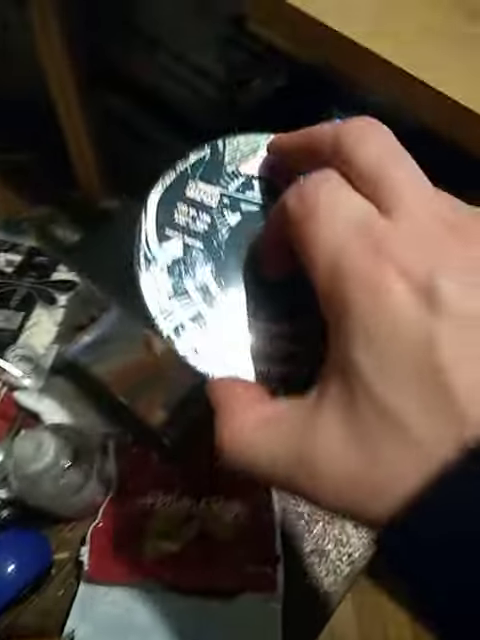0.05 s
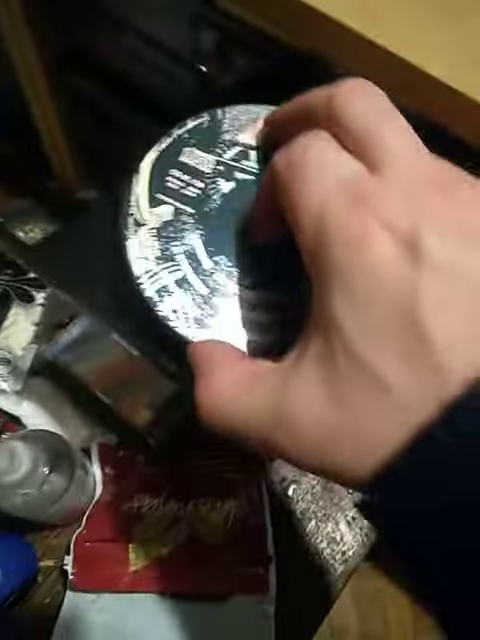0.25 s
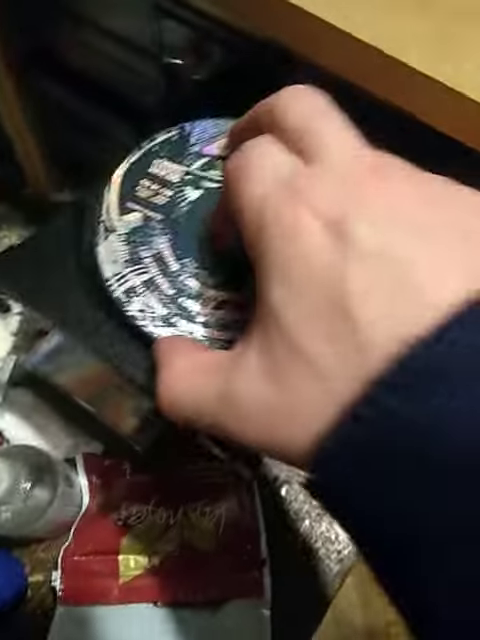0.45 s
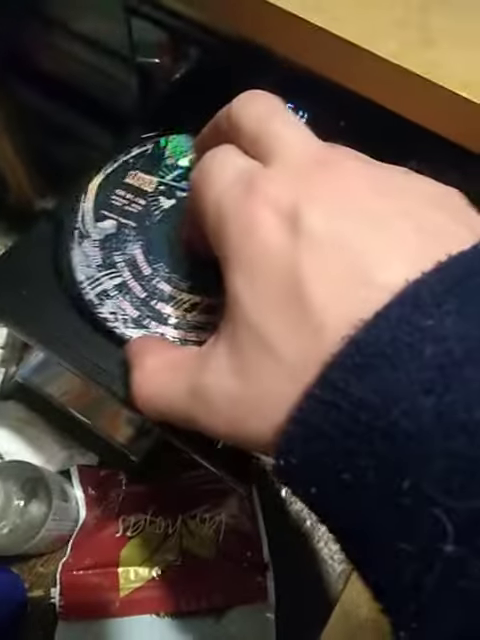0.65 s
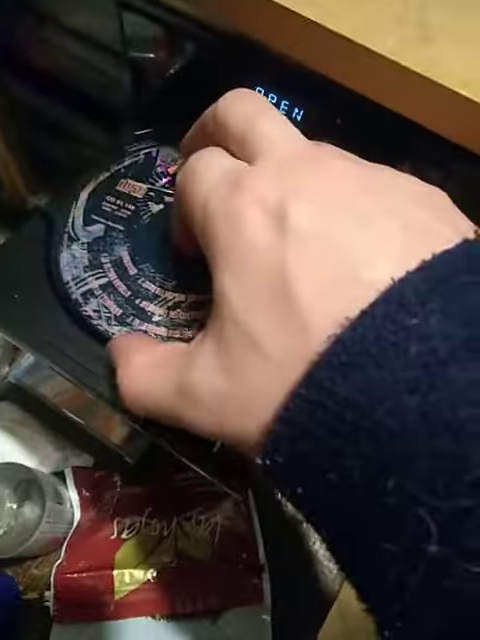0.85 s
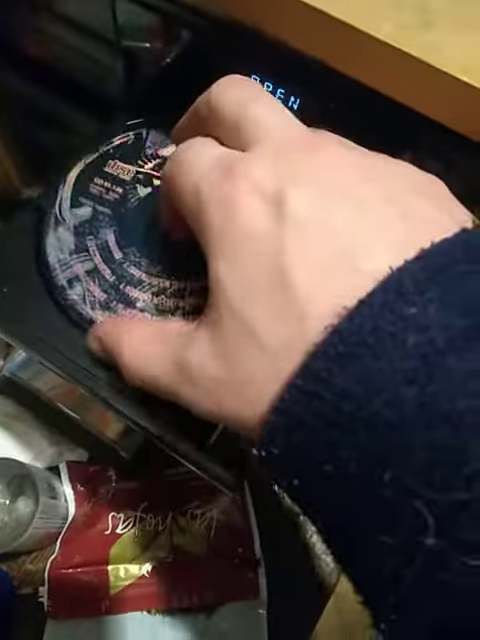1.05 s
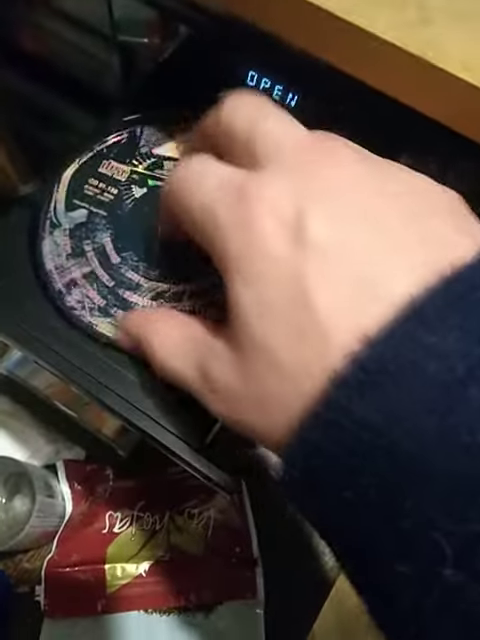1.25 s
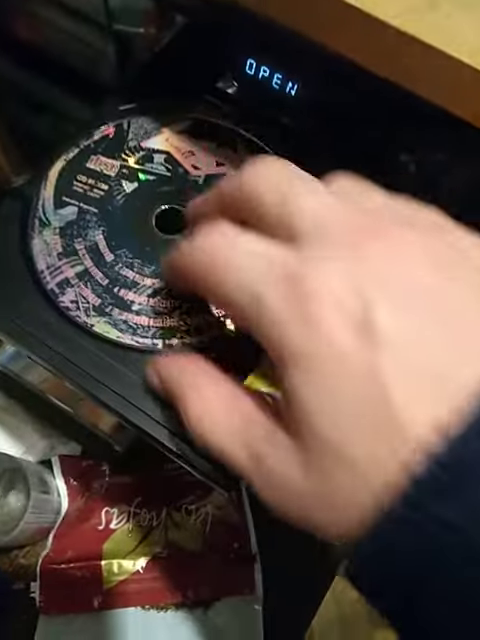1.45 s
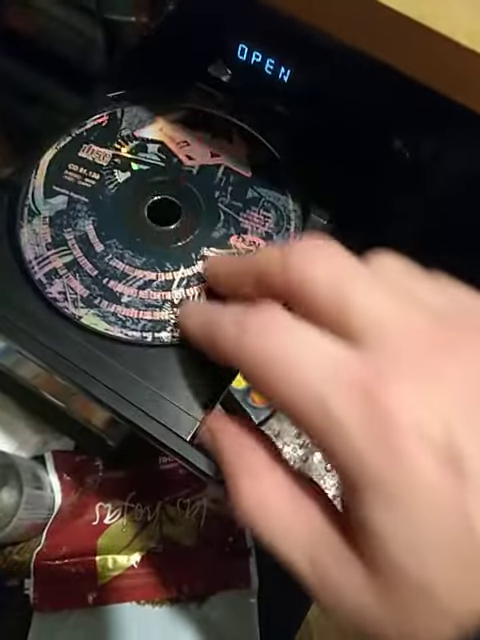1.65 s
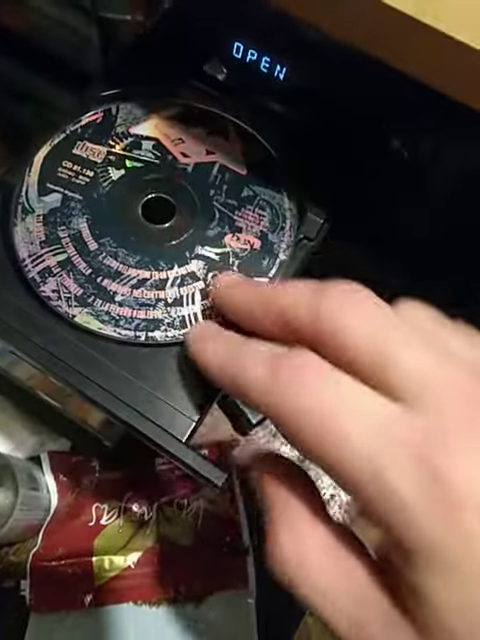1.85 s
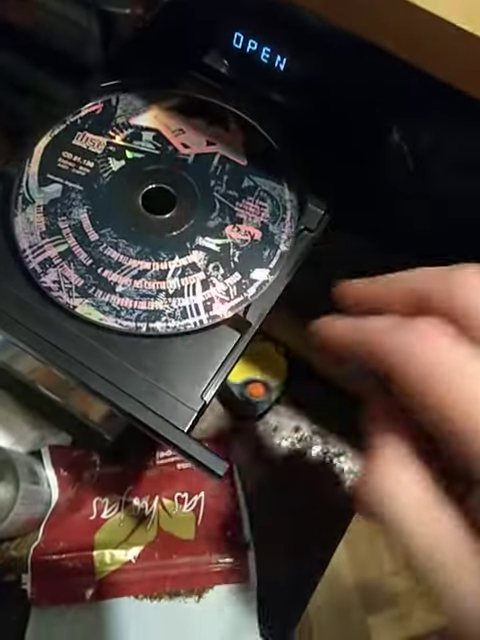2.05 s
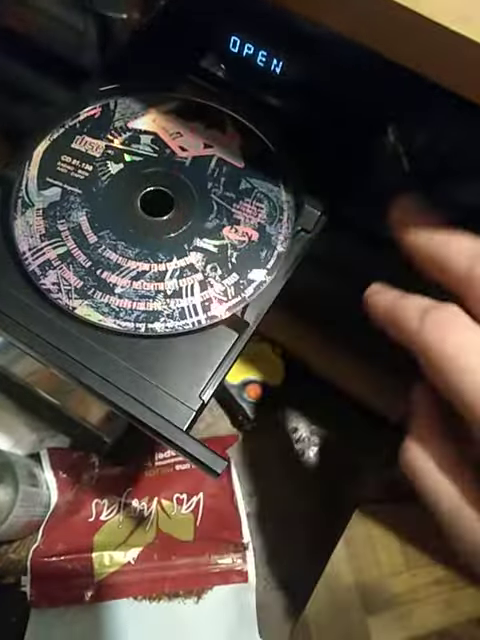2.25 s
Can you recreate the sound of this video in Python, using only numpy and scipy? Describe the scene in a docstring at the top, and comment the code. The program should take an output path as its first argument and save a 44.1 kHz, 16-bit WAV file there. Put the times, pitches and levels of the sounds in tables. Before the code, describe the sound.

Close phone pickup in a quiet indoor room with low lumpy rumble and soft hiss. Just after one second a disc snaps into a hollow plastic tray, followed by tiny ticks and a faint finger scuff. After a near-silent pause, latches knock, a small geared motor whirrs for about a second and a half, and the mechanism clunks to a stop.

```python
"""A quiet room: low lumpy rumble and flickering hiss, then a faint squeak. A hand sets a disc in a
plastic tray with a clack and a finger scuffs it; later latches knock, a small geared motor whirrs and
the mechanism clunks to a stop. Blows are contact rattles through ringing modes, gears and room are
shaped noise, the motor is a set of shaft orders. A phone hears it: each channel subtracts a delayed
copy of the other microphone to widen the picture."""
import sys
import numpy as np
from scipy import signal
from scipy.fft import rfft, irfft
from scipy.io import wavfile
from scipy.ndimage import uniform_filter1d

SR = 44100
rng = np.random.default_rng(int(sys.argv[2]) if len(sys.argv) > 2 else 0)


def gain_from_db(level_db):
    """Convert decibel levels to linear amplitude factors (20 dB per decade)."""
    decades = np.asarray(level_db, float) / 20
    return 10 ** decades


def master(y):
    """Save y as 16-bit WAV."""
    cut = np.clip(np.atleast_2d(y).T, -1, 1)
    pcm = np.round(cut * 32767)  # scale
    wavfile.write(sys.argv[1], SR, pcm.astype(np.int16))


N = 246078


def evened(x):
    """Scale to rms 1."""
    return x / np.sqrt(np.mean(x ** 2) + 1e-20)


def read(points, hz):
    """Interpolate a table over log frequency."""
    f, value = np.transpose(points)
    return np.interp(np.log(hz + 1), np.log(f + 1), value)


def curves(rows, t):
    """Interpolate each column of a table over time."""
    s, *columns = np.transpose(rows)
    return [np.interp(t, s, c) for c in columns]


def switched(t, on_s, off_s, fade_s):
    """Gate with linear fades inside its ends."""
    return np.clip(np.minimum(t - on_s, off_s - t) / fade_s, 0, 1)


def slow(samples):
    """Random wander of rms 1, from white noise averaged twice over this many samples."""
    once = uniform_filter1d(rng.standard_normal(N), int(samples))
    return evened(uniform_filter1d(once, int(samples)))


def noise(spectrum, likeness, patchy_db):
    """Two-microphone noise of rms 1: given spectrum, correlation and drifting time-frequency patches."""
    a, b, c, d, patches = rng.standard_normal((N // 128 + 5, 257, 5)).T
    patches = uniform_filter1d(patches, 6, 0)
    patches = evened(uniform_filter1d(patches, 12, 1))
    first = a + 1j * b
    second = likeness * first + np.sqrt(1 - likeness ** 2) * (c + 1j * d)
    z = np.array([first, second]) * gain_from_db(patchy_db * patches)
    white = signal.istft(z, nperseg=512, noverlap=384)[1][:, :N]
    gain = gain_from_db(read(spectrum, np.fft.rfftfreq(N, 1 / SR)))
    return evened(irfft(rfft(white) * gain, N))


def resonate(x, hz, width_hz):
    """A resonance applied twice, so that its skirts fall steeply."""
    r = np.exp(-np.pi * width_hz / SR)
    pole = [1, -r * np.exp(2j * np.pi * hz / SR)]
    return signal.lfilter([1], np.convolve(pole, pole), x).real


def causal(db):
    """Minimum-phase impulse response with this gain on the rfft bins."""
    log = np.log(gain_from_db(np.concatenate([db, db[-2:0:-1]])))
    return np.fft.ifft(np.exp(signal.hilbert(log).conj())).real[:len(db) // 2]


# low rumble: t/s, level/dB
ROOM_LEVEL = [(0, -63.5), (.95, -61), (1.2, -55), (1.7, -59.5), (2.3, -57), (3.07, -61.5), (3.6, -59)]
# low rumble of room and tray: f/Hz, density/dB per Hz
RUMBLE_SPECTRUM = [(30, -24), (70, -10.5), (110, -9), (163, 1), (200, -8.5), (250, -1.5), (310, -3.5),
                   (360, -48), (600, -51.5)]
# hiss of the phone: f/Hz, density/dB per Hz
HISS_SPECTRUM = [(40, 8.5), (350, -9.5), (500, -9.5), (1000, -14), (2000, -18.5), (4000, -22),
                 (8000, -29.5), (15000, -40)]
HISS_DB = -62  # before flicker


def room(t):
    """Low rumble in lumps, stronger at the left port, plus nearly uncorrelated, flickering hiss."""
    rumble_db, = curves(ROOM_LEVEL, t)
    lumps = slow(370)
    port_gain = gain_from_db(np.array([[1.5], [-1.5]]))
    rumble = gain_from_db(rumble_db + 4.47 * lumps) * noise(RUMBLE_SPECTRUM, 0.35, 0.85) * port_gain
    flicker_db = 0.4 * lumps + 1.6 * slow(400) + 0.9 * slow(4000)
    return rumble + gain_from_db(HISS_DB + flicker_db) * noise(HISS_SPECTRUM, 0.012, 1.0)


# squeaks: t/s, half length/s, f/Hz, level/dB, octave re fundamental/dB
SQUEAK_EVENTS = [(0.989, 0.014, 878, -56.5, -2.5), (2.985, .04, 1390, -67, -6)]


def squeak(t):
    """Faint tones with octaves, roughened by pitch wander; left microphone only."""
    wander = 1 + 0.021 * slow(130)
    out = np.zeros((2, N))
    for s, half_s, hz, db, octave_db in SQUEAK_EVENTS:
        turns = np.cumsum(hz * wander) / SR
        tone = np.cos(2 * np.pi * turns) + gain_from_db(octave_db) * np.cos(2 * np.pi * 2 * turns)
        out[0] += gain_from_db(db) * np.exp(-((t - s) / half_s) ** 2) * tone
    return out


# contact noise: f/Hz, density/dB per Hz
CRACK_SPECTRUM = [(60, -21), (200, -3.5), (500, -1), (1000, 4.5), (2000, -5), (3500, -5.5), (6000, -13.5),
                  (8000, -25), (11000, -35.5), (15000, -38.5)]
HARDEST_S, HARDEST_DB = 0.002, 16  # hardest contact: after first touch, above the others
RING_CAP_S = 0.1  # longest modal t60


def blow(modes, muffle_db, level_db, tilt_db, t60, body_db, ring_db):
    """A short rattle of contacts, heard directly and through the modes of the struck part."""
    t, hz = np.arange(8192) / SR, np.fft.rfftfreq(4096, 1 / SR)
    common, *own = rng.standard_normal((3, len(t)))
    rattle = (common + 1.5 * np.array(own)) * (1 - np.exp(-t / 0.00077)) * gain_from_db(-60 * t / t60)
    rattle[:, round(HARDEST_S * SR)] += gain_from_db(HARDEST_DB)
    rings = sum(gain_from_db(db - 60 * t / min(ring_s, RING_CAP_S)) * np.sin(2 * np.pi * f * t)
                for f, db, ring_s in modes)
    crack = causal(read(CRACK_SPECTRUM, hz))
    voice = gain_from_db(ring_db) * rings / np.linalg.norm(rings)
    voice[:len(crack)] += crack / np.linalg.norm(crack)
    tilt = tilt_db * np.log2((hz + 100) / 1500)
    body = body_db / (1 + (hz / 600) ** 4)
    muffle = muffle_db / (1 + (5600 / (hz + 1)) ** 8)
    coloured = signal.fftconvolve(voice, causal(tilt + body + muffle))
    sound = signal.fftconvolve(rattle, coloured[None], axes=1)[:, :len(t)]
    return gain_from_db(level_db) * sound / np.sqrt((sound[:, :400] ** 2).mean())  # rms of the first 9 ms


RATTLE_LOSS = 0.21  # dB of rattle t60 lost per dB of ringing


def struck(modes, rows, rattle_s):
    """Sum of blows on one part; blows that ring more rattle shorter."""
    out = np.zeros((2, N + 8192))
    for s, level_db, tilt_db, body_db, ring_db in rows:
        muffle_db = -12 * (s > SHAFT_SPEED[0][0])  # later blows fall deep inside the case, which dulls them
        t60 = rattle_s * gain_from_db(-RATTLE_LOSS * ring_db)
        sound = blow(modes, muffle_db, level_db, tilt_db, t60, body_db, ring_db)
        out[:, round(s * SR):][:, :8192] += sound
    return out


# tray modes: f/Hz, level/dB, t60/s
TRAY_MODES = [(328, -6, 0.1), (523, -5, 0.08), (650, -10, .03), (820, -4, 0.045), (1030, 0, 0.05),
              (1090, -4, 0.04), (1310, -8, .025), (1830, -8, 0.017), (3461, -7, 0.03), (5927, -14, .03)]
# disc on tray: t/s, rms of first 9 ms/dB, tilt/dB per octave, low body/dB, ringing re contact noise/dB
DISC_HITS = [(1.167, -53, -3.5, -6, -1), (1.183, -36.5, 0.5, -3, 22), (1.188, -25.5, 4, 8, 3.5),
             (1.194, -32.5, 1.5, 7.5, 10), (1.206, -32, -2, 16.5, -17), (1.294, -49.5, 1.5, 4, -11),
             (1.366, -47, 2, 3, -13), (1.806, -58, 0.5, -16, 1), (1.817, -50.5, -1.5, -7, -8),
             (1.852, -62.5, -2, -9, -12)]


def disc():
    """The disc clacks into the plastic tray and excites its modes."""
    return struck(TRAY_MODES, DISC_HITS, rattle_s=0.078)  # t60 at 0 dB ringing


# wall echoes: f/Hz, t60/s
WALL_DECAY = [(300, 0.37), (2000, 0.17), (8000, 0.23)]


def walls(strikes):
    """Add sparse random-sign echoes, decaying at a frequency-dependent rate."""
    taps = np.zeros((2, SR))
    at = np.arange(300, SR - 20, 20) + rng.integers(0, 20, (2, (SR - 301) // 20))
    np.put_along_axis(taps, at, rng.choice([-1., 1.], at.shape), 1)
    hz, t, z = signal.stft(taps, SR, nperseg=256)
    decay = gain_from_db(-60 * t / read(WALL_DECAY, hz)[:, None])
    tail = signal.istft(z * decay, SR, nperseg=256)[1]
    wet = signal.fftconvolve(strikes, tail / np.linalg.norm(tail[0]), axes=1)
    return strikes[:, :N] + gain_from_db(-8.5) * wet[:, :N]


# finger on tray: f/Hz, density/dB per Hz
SCUFF_SPECTRUM = [(400, -20), (1000, -1), (3600, -10), (8000, -29)]
SCUFF_S, SCUFF_HALF_S, SCUFF_DB = 1.805, 0.042, -60.5


def scuff(t):
    """A finger brushes the tray: a soft swell of friction noise."""
    swell = np.exp(-((t - SCUFF_S) / SCUFF_HALF_S) ** 2)
    return gain_from_db(SCUFF_DB + 1.9 * slow(200)) * swell * noise(SCUFF_SPECTRUM, 0.4, 5.7)


# chassis modes: f/Hz, level/dB, t60/s
CHASSIS_MODES = [(365, -2.5, 0.1), (611, -5.5, 0.21), (880, -4.5, 0.036), (1080, -0.5, 0.02),
                 (1288, -1, 0.038), (1402, 7, 0.042), (1860, 9, 0.0075), (3510, -1.5, 0.046)]
# latches: t/s, rms of first 9 ms/dB, tilt/dB per octave, low body/dB, ringing re contact noise/dB
LATCH_HITS = [(3.713, -37.5, 0.3, -43, -6.5), (3.757, -33, 0.7, -1, 0), (3.786, -40.5, 7, -6, -2),
              (3.801, -34.5, -1, 5.5, -21), (3.857, -38.5, 0, 0.5, -4), (3.866, -39, 1, -7, 4.5),
              (3.883, -27, -5, -17.5, 4), (3.902, -37.5, -1.5, 1, 2.5), (4.589, -38, -2, -27.5, 16),
              (5.156, -33, 2, -13, 2), (5.165, -38, 0, 3, 7), (5.199, -42.5, -0.5, 6, -5),
              (5.222, -29.5, 3.5, 26.5, 13), (5.229, -33, -2.5, 14, 7), (5.292, -41, 0.5, 17, -1),
              (5.326, -41.5, 3.5, -2, 13), (5.351, -37, 3.7, 10, -1), (5.395, -42, -3.5, -1, 4)]


def latches():
    """Latches and the stopping mechanism knock on the chassis and excite its modes."""
    return struck(CHASSIS_MODES, LATCH_HITS, rattle_s=0.056)  # t60 at 0 dB ringing


# gear mesh noise: t/s, level/dB
MESH_LEVEL = [(3.72, -86), (3.85, -52), (3.891, -42.5), (4.551, -43.5), (4.6, -47), (4.96, -42.5),
              (5.13, -44.5), (5.3, -40), (5.41, -44), (5.45, -52), (5.519, -78.5)]
# free running mesh: f/Hz, density/dB per Hz
RUNNING_SPECTRUM = [(350, -2), (420, -24.5), (550, -13), (700, -3), (820, -3), (1200, 1), (1500, 3),
                    (1900, -4), (2400, -6.5), (3000, -12), (3700, -2.5), (4600, -5), (5200, -19.5),
                    (5900, -37), (6500, -23.5), (12000, -87.5)]
# strained mesh: f/Hz, density/dB per Hz
STRAINING_SPECTRUM = [(60, 5.5), (150, -4.5), (350, 10), (600, 3), (1000, 0), (1500, -13.5), (2400, -15),
                      (3300, -1.5), (4600, -14), (5900, -29), (8000, -62), (12000, -82)]
# case resonances rung by the gears: f/Hz, width of one pass/Hz, level/dB
CASE_MODES = [(864, 69, -3), (1033, 18, -6.5), (1373, 34, 1), (1450, 36, -1.5), (3700, 180, -13.5),
              (5300, 30, -20.5), (5870, 40, -32), (6370, 40, -31)]
TRAY_DB, TRAY_ENDS_DB = -46, -12  # sliding tray rumble; change at start and stop
TRAY_RISE_S, TRAY_FALL_S = 0.14, 0.061
STRAIN_FROM_S, STRAIN_RISE_S, STRAIN_SHARE = 5.15, 0.055, 0.73  # as the mechanism locks
SQUEAL_FROM_S, SQUEAL_TOP_S, SQUEAL_END_S, SQUEAL_DB = 4.86, 5.15, 5.19, -49  # rough whistle
BUZZ = 0.18  # depth of the once-a-turn pulse


def gears(t):
    """Teeth rub and chatter unevenly and ring the case; under strain the sound drops lower."""
    mesh_db, = curves(MESH_LEVEL, t)
    on_s, off_s = MESH_LEVEL[0][0], MESH_LEVEL[-1][0]
    rub = noise([(20, 0.0091), (20000, 0.0068)], 0.4, 3.2) * gain_from_db(1.5 * slow(150))  # nearly white
    case = evened(sum(gain_from_db(db) * evened(resonate(rub, hz, width_hz)) for hz, width_hz, db in CASE_MODES))
    turns = np.cumsum(curves(SHAFT_SPEED, t)[0]) / SR
    buzz = 1 + BUZZ * np.cos(2 * np.pi * turns)
    running = buzz * noise(RUNNING_SPECTRUM, 0.022, 1.9) + gain_from_db(-5.5) * case
    chatter_db = 5.0 + 2.7 * np.tanh(slow(78))
    straining = gain_from_db(chatter_db) * noise(STRAINING_SPECTRUM, 0.11, 0.4)
    strain = STRAIN_SHARE * np.clip((t - STRAIN_FROM_S) / STRAIN_RISE_S, 0, 1)
    mesh = np.sqrt(1 - strain) * running + np.sqrt(strain) * straining

    sliding = np.clip(np.minimum((t - on_s) / TRAY_RISE_S, (off_s - t) / TRAY_FALL_S), 0, 1)
    tray_db = TRAY_DB + TRAY_ENDS_DB * (1 - sliding)
    tray = gain_from_db(tray_db + 1.2 * slow(260)) * noise(RUMBLE_SPECTRUM, 0.21, 1.0)

    swell = np.interp(t, (SQUEAL_FROM_S, SQUEAL_TOP_S, SQUEAL_END_S), (0, 1, 0))
    squeal = gain_from_db(SQUEAL_DB) * swell * evened(resonate(rub, hz=3427, width_hz=130))
    total = gain_from_db(mesh_db + 1.8 * slow(330)) * mesh + tray + squeal
    return total * switched(t, on_s, off_s, 0.0058)


# shaft speed, sagging under load in mid travel: t/s, f/Hz
SHAFT_SPEED = [(3.922, 280.7), (3.998, 288.2), (4.25, 289.3), (4.449, 289.5), (4.54, 277), (4.88, 273),
               (4.979, 287.8), (5.081, 293), (5.22, 290)]
# shaft orders, one per mount row: multiple of shaft speed
SHAFT_ORDERS = (2, 3, 4, 6, 12, 5)
# motor mount: resonance f/Hz, width/Hz, tone peak level/dB, phase gap between microphones/rad, waver/dB
MOUNT_MODES = [(536, 37, -51.5, 0.87, 3.7), (868, 15, -42.5, 1.24, 1.2), (1095, 67, -58.5, 1.4, 3.7),
               (1674, 80, -55, 1.9, 2.1), (3551, 58, -56, 1.25, 7.3), (1413, 59, -41.5, 1.03, 3.4)]
LOADED_FROM_S, LOADED_TO_S = 4.24, 4.97  # second order sounds while the tray loads the shaft
DAMPED_FROM_S, DAMPING_DB_PER_S = 5.0, -110  # fifth order dies as the tray seats


def motor(t):
    """Shaft orders as wavering tones, loudest near mount resonances, each with its own phase gap."""
    hz, = curves(SHAFT_SPEED, t)
    turns = np.cumsum(hz * (1 + 0.0025 * slow(447))) / SR
    # a gear wheel runs out of round
    throb = 1 + 0.41 * np.cos(2 * np.pi * turns / 5.2 + 1.15 * slow(1500))
    out = np.zeros((2, N))
    for order, (mount_hz, width_hz, db, gap_rad, waver_db) in zip(SHAFT_ORDERS, MOUNT_MODES):
        gain = 1 / (1 + ((order * hz - mount_hz) / width_hz) ** 2)
        if order == 2:
            gain = gain * switched(t, LOADED_FROM_S, LOADED_TO_S, 0.05)
        if order == 5:
            gain = gain * gain_from_db(DAMPING_DB_PER_S * np.maximum(t - DAMPED_FROM_S, 0))
        tone = np.cos(2 * np.pi * order * turns + np.array([[0], [gap_rad]]))
        order_throb = throb ** min(order / 5, 1)  # shallower on low orders
        out += gain * gain_from_db(db + waver_db * slow(260)) * tone * order_throb
    return out * switched(t, SHAFT_SPEED[0][0], SHAFT_SPEED[-1][0], 0.0046)


def scene():
    """All sources at the two microphones; only the blows have echoes."""
    t = np.arange(N) / SR
    blows = walls(disc() + latches())
    return room(t) + squeak(t) + blows + scuff(t) + gears(t) + motor(t)


def low_pass(x):
    """Removes everything above the highest recorded frequency."""
    return signal.sosfilt(signal.butter(12, 15790, fs=SR, output="sos"), x)


# widening: f/Hz, share of the other microphone subtracted/1
CROSS_SHARE = [(60, 0.75), (220, 0.081), (500, 0.4), (2120, 0.94), (2430, 0.83), (4600, 0.42), (7000, 0.19),
               (10000, 0.09), (15000, 0.29)]
DELAY_SAMPLES, BASS_HZ, EDGE_HZ = 19.34, 45, 15350


def record(dry):
    """Each side loses a delayed copy of the other microphone; deepest bass and top treble are cut."""
    hz = np.fft.rfftfreq(N + 64, 1 / SR)
    delay = np.exp(-2j * np.pi * hz / SR) ** DELAY_SAMPLES
    ports = rfft(dry, N + 64)
    wide = ports - read(CROSS_SHARE, hz) * delay * ports[::-1]
    wide *= (1j * hz / (1j * hz + BASS_HZ)) ** 3  # the microphones lose the deepest bass
    wide *= 1 / (1 + (hz / EDGE_HZ) ** 120)
    mix = irfft(wide, N + 64)[:, :N]
    return low_pass(mix)


dry = scene()
out = record(dry)
master(out)
```